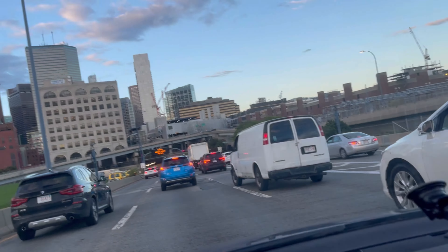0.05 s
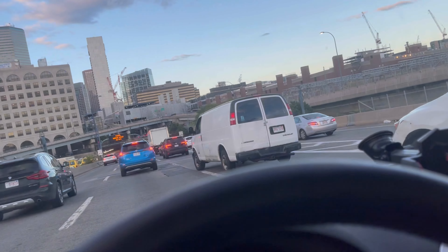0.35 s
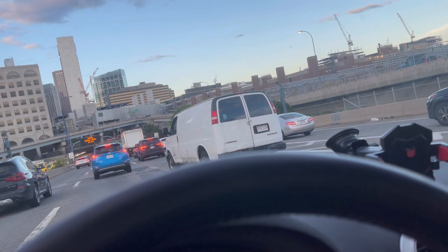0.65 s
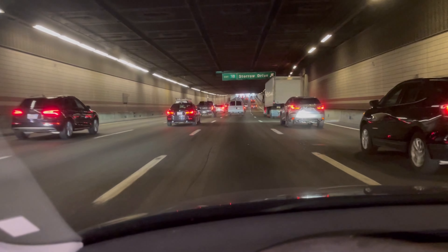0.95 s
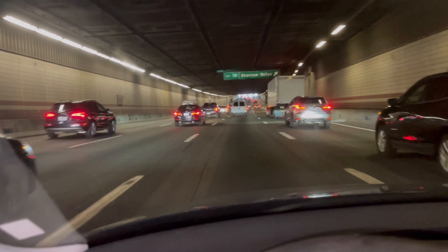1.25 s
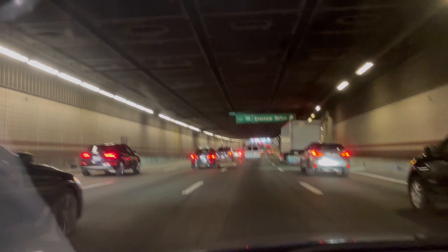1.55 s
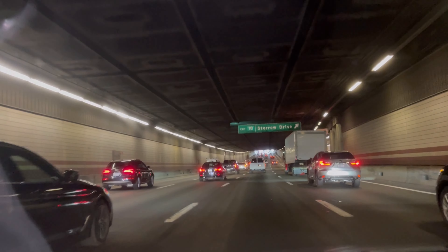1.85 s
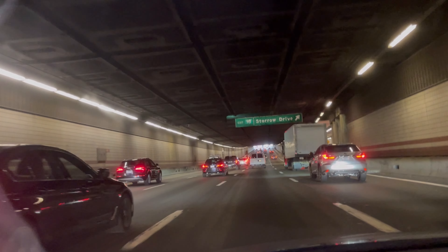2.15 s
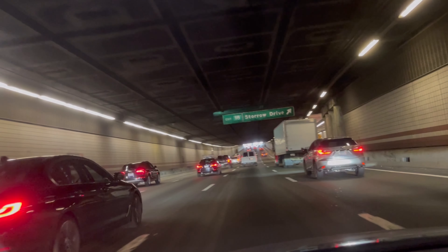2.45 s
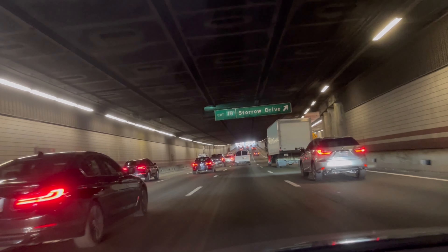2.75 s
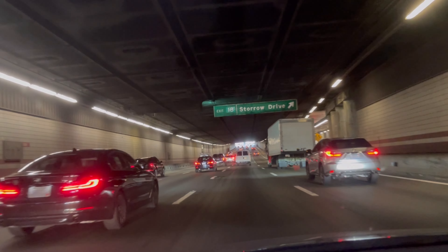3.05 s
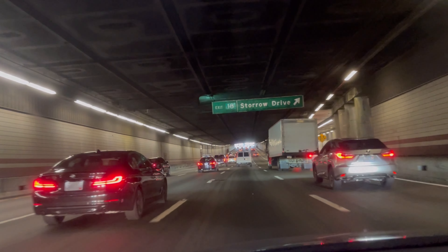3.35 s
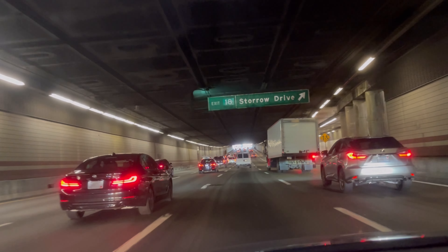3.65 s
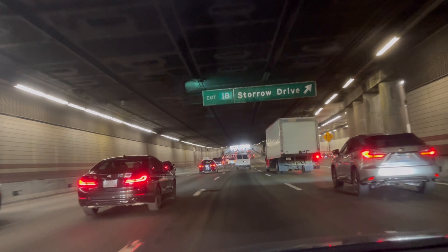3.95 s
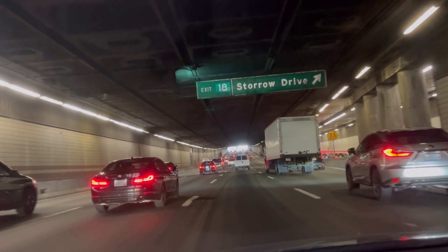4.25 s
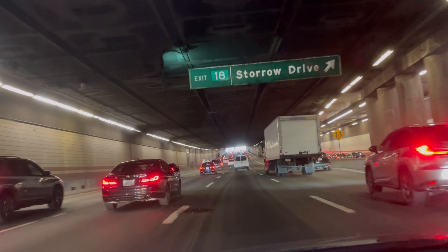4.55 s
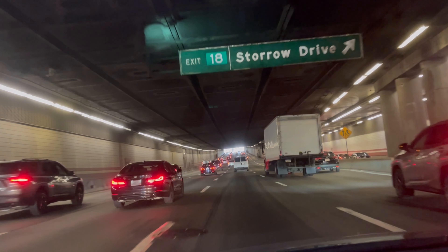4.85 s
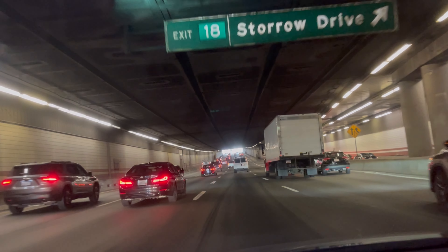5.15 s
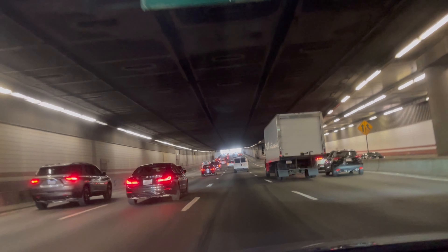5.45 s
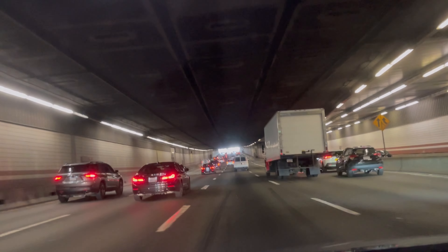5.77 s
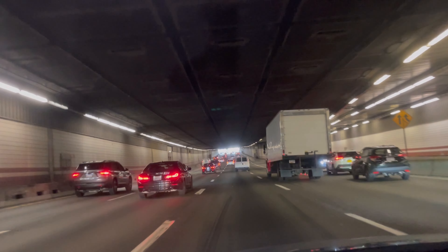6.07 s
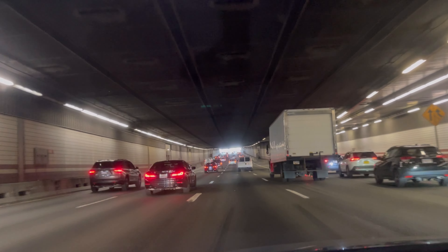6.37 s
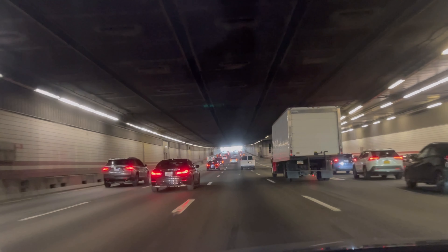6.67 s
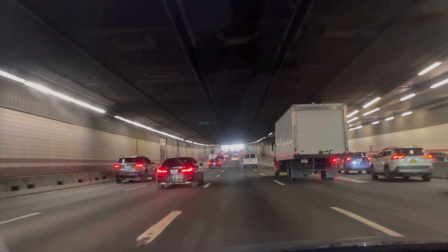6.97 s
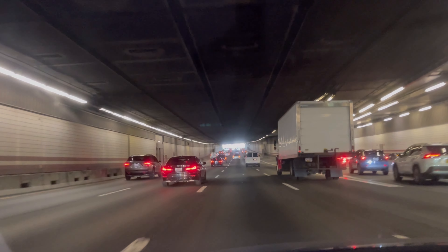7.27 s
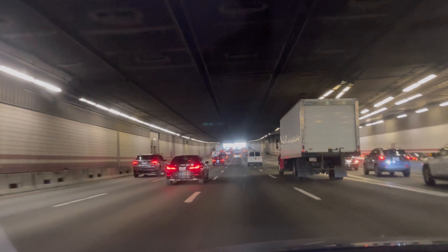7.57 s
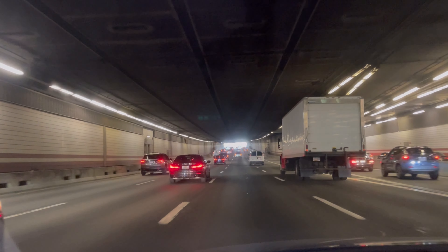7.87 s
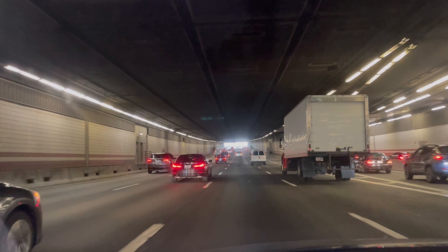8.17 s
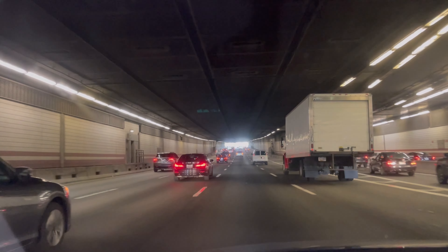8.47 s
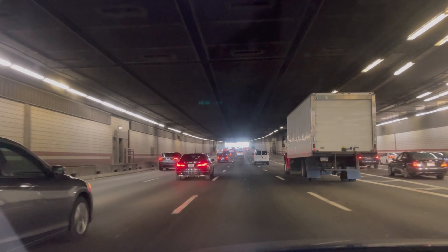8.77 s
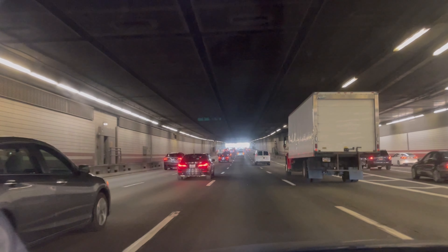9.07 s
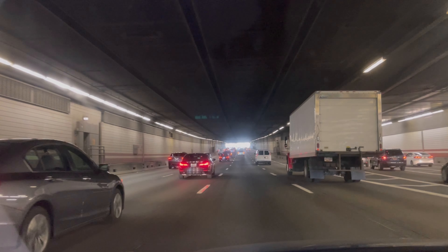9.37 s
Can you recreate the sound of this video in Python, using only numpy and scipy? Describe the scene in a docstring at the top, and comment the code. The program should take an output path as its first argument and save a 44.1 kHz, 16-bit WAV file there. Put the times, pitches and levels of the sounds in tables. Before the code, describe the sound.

Low road and engine rumble inside a moving car, turning fuller with tyre drone and muffled traffic in a tunnel.

```python
"""Inside a car in highway traffic: on the open road, then abruptly, with a click, in a tunnel.
The road shakes the cabin's low resonances; the engine booms as it pulls and shifts up twice.
The tunnel walls return the tyres' drone, and the traffic's roar comes dully through the glass.
Fingers rub and tick on the hand-held camera, and the trim squeaks faintly."""
import sys
import numpy as np
from scipy import signal
from scipy.fft import rfft, irfft, next_fast_len
from scipy.io import wavfile
from scipy.ndimage import uniform_filter1d, map_coordinates

SR = 44100
rng = np.random.default_rng(int(sys.argv[2]) if len(sys.argv) > 2 else 0)


def generate_wav(signal):
    """Clip the signal to [-1, 1] and save it as 16-bit WAV at the path in sys.argv[1]."""
    frames = np.transpose(np.atleast_2d(signal))
    scaled = np.clip(frames, -1, 1) * 32767
    pcm = np.round(scaled).astype(np.int16)
    wavfile.write(sys.argv[1], SR, pcm)


N = 419832
TUNNEL_START_S = 0.697


# car body modes: pitch_hz, width_hz, level_db
BODY_MODES = [(43.7, 9.7, -3), (53, 8, -5), (70.4, 43, -9.5), (86.5, 12, -6.5), (102.1, 14, 0.5),
              (116.3, 26, -2.5), (132.2, 15, -5.5), (162.2, 37, -14)]
# shake from the road surface: time_s, level_db
SURFACE_SHAKE = [(0, -42.5), (.33, -48), (.64, -43), (.78, -37.5), (1.55, -39.5), (2.35, -40),
                 (2.63, -38.5), (3.17, -40), (3.42, -38.5), (4.4, -39.5), (4.75, -40), (5.35, -42.5),
                 (6.03, -39), (6.22, -42.5), (6.45, -41), (7.1, -39.5), (8.24, -39), (8.55, -41),
                 (9.52, -43.5)]

def road():
    """The rough surface shakes the body's low modes; more pace favours the higher ones."""
    def body_noise(tilt):
        return cabin_noise(lambda hz: resonances(BODY_MODES)(hz) * np.clip(hz / 110, .6, 1.6) ** tilt)
    slow, fast = body_noise(tilt=-.7), body_noise(tilt=1.15)
    shake = np.sqrt(1 - pace()) * slow + np.sqrt(pace()) * fast
    shake_db, = curves(SURFACE_SHAKE)
    return pan(steadied(shake) * amp(shake_db - 0.02), left_db=2.5)


# engine speed: time_s, firing_hz
FIRING_RATE = [(0, 50.3), (.6, 48), (.75, 41.5), (1, 50.5), (2, 54), (2.85, 56.5), (3.1, 48), (3.6, 47.5),
               (4.2, 43.6), (5, 46), (6.9, 53), (8.25, 57), (8.6, 49.5), (9.3, 46.5)]
BOOM_HZ, BOOM_WIDTH_HZ = 48.6, 18
OCTAVE_HZ, OCTAVE_WIDTH_HZ, OCTAVE_DB = 114, 5.3, -4.5

def engine():
    """The firing tone and its octave grow with load and swell as each meets a cabin air mode."""
    firing_hz, = curves(FIRING_RATE)
    phase = 2 * np.pi * np.cumsum(firing_hz * (1 + .009 * wobble(7))) / SR
    mode_gain = lambda hz, mode_hz, width_hz: 1 / np.hypot(1, 2 * (hz - mode_hz) / width_hz)
    boom = np.sin(phase) * mode_gain(firing_hz, BOOM_HZ, BOOM_WIDTH_HZ)
    octave = np.sin(2 * phase) * mode_gain(2 * firing_hz, OCTAVE_HZ, OCTAVE_WIDTH_HZ) * amp(OCTAVE_DB)
    waver_db = -1.52 + 2.1 * wobble(9)
    return pan(np.sqrt(2) * (boom + octave) * throttle() * amp(waver_db), left_db=-0.5)


# accelerator presses: start_s, end_s, gain_db
PEDAL_PRESSES = [(0.058, 0.149, -38.5), (0.853, 2.85, -42), (3.066, 3.58, -40), (4.6, 5.1, -41),
                 (5.101, 6.397, -38.5), (6.406, 8.553, -40.5), (8.599, 9.363, -40)]
PEDAL_RISE_S, PEDAL_FALL_S, COAST_DB = 0.041, 0.053, -53

def throttle():
    """Engine load as a gain: each press builds, holds and dies back to coasting."""
    t = clock()
    ramp = lambda x: (1 + np.tanh(x)) / 2
    load = np.full(N, amp(COAST_DB))
    for start_s, end_s, gain_db in PEDAL_PRESSES:
        pressed = ramp((t - start_s) / PEDAL_RISE_S) * ramp((end_s - t) / PEDAL_FALL_S)
        load += (amp(gain_db) - amp(COAST_DB)) * pressed
    return load


# tyre air modes, split by rolling: slow_hz, fast_hz, width_hz, level_db
CAVITY_MODES = [(223.1, 222.5, 8, -.5), (228.6, 241, 11, -1.5)]
# tyre wall rumble: pitch_hz, width_hz, level_db
TYRE_WALL_BANDS = [(199, 77, 0.5), (229.4, 30, 0.5), (259, 64, -3)]
# tyre drone in the tunnel: time_s, level_db
DRONE_LEVEL = [(.7, -55.5), (1.05, -55.5), (2.25, -58), (2.8, -55.5), (3.1, -56), (3.52, -52), (3.9, -55.5),
               (4.35, -50), (4.72, -55.5), (5.07, -48.5), (5.4, -53.5), (5.9, -51), (6.2, -57), (6.8, -49),
               (6.98, -57), (7.25, -52), (7.9, -54), (8.2, -49), (8.5, -57.5), (9, -54), (9.33, -51),
               (9.52, -49.5)]

def tyre_drone():
    """The air in the tyres rings at two pitches that part with pace, over the tyre walls' rumble."""
    cavity = sum(hum(slow_hz + (fast_hz - slow_hz) * pace(), width_hz, side_db=-15.5) * amp(level_db)
                 for slow_hz, fast_hz, width_hz, level_db in CAVITY_MODES)
    walls = cabin_noise(resonances(TYRE_WALL_BANDS)) * amp(-1.5)
    drone_db, = curves(DRONE_LEVEL)
    return steadied(cavity + walls) * amp(drone_db)


# tunnel traffic spectrum: freq_hz, level_db
ROAR_SPECTRUM = [(200, -5), (330, 8), (480, 4.5), (600, 0), (850, -2), (1100, -3), (1550, -9.5),
                 (1680, -12), (2400, -17), (3500, -22), (5000, -30.5), (7000, -40.5), (9200, -38),
                 (10500, -52), (12000, -46), (14000, -52)]
# pane and panel modes: pitch_hz, width_hz, level_db
PANE_MODES = [(397, 47, -4), (665, 50, -5), (835, 130, -6.5), (1520, 19, -6), (1747, 33, -4),
              (2350, 540, -12.5)]
ROAR_SLOW_DB, ROAR_PACE_DB = -65, 5

def traffic_roar():
    """The traffic's roar grows with pace and is coloured by the panes it passes through."""
    through_glass = lambda hz: colour(ROAR_SPECTRUM)(hz) * (1 + resonances(PANE_MODES)(hz))
    return cabin_noise(through_glass) * amp(ROAR_SLOW_DB + ROAR_PACE_DB * pace() + 0.52 * wobble(11))


# tyre tread hum: time_s, pitch_hz, level_db
TREAD_HUM = [(.7, 315, -67.5), (3.2, 305, -69), (4.2, 350, -64.5), (5.6, 366, -64), (6.5, 362, -63.5),
             (8.1, 382, -64), (8.8, 375, -66.5), (9.52, 372, -63.5)]

def tread():
    """The tread's hum rises and grows as the car gathers speed."""
    pitch_hz, level_db = curves(TREAD_HUM)
    return hum(pitch_hz, width_hz=62, side_db=-5.5) * amp(level_db)


# tyre hiss of the next lanes: pitch_hz, width_hz, level_db
HISS_BANDS = [(2540, 660, 1.5), (3900, 660, -10)]
# vehicles alongside: middle_s, half_length_s, level_db
CLOSE_PASSES = [(4.798, 0.61, -88.5), (7.599, 0.55, -85.5), (9.101, .5, -84)]

def passing_hiss():
    """Tyre hiss swells and fades as each vehicle draws close."""
    return cabin_noise(resonances(HISS_BANDS)) * swells(CLOSE_PASSES)


def tunnel():
    """The walls return the noise of the tyres and of all the traffic."""
    traffic = traffic_roar() + passing_hiss()
    return pan(tyre_drone(), left_db=1) + pan(traffic + tread(), left_db=1.6)


# outdoor tyre noise spectrum: freq_hz, level_db
OPEN_ROAD_SPECTRUM = [(140, -19), (205, 5), (270, -16.5), (335, -5), (420, -7), (560, -25.5), (690, -11),
                      (780, -20), (1000, -20), (1500, -32), (2600, -37), (4000, -44), (6000, -53.5),
                      (13000, -63.5)]

def open_road():
    """Outdoors the tyre noise escapes and little comes back."""
    return pan(cabin_noise(colour(OPEN_ROAD_SPECTRUM)) * amp(-67.5), left_db=1)


def click():
    """A sharp click where the scene cuts from open road to tunnel."""
    age_s = clock() - TUNNEL_START_S
    return pan(amp(-40.5) * (age_s >= 0) * np.exp(-np.abs(age_s) / 0.0024), left_db=0.5)


# plastic modes: pitch_hz, level_db, t60_s
PLASTIC_MODES = [(432, -0.5, 0.029), (834, 1, 0.02), (1350, -6.5, .014)]
KNOCK_S, KNOCK_DB = 0.5492, -57

def knock():
    """A small dull knock rings three damped modes of plastic."""
    age_s = np.maximum(clock() - KNOCK_S, 0)
    ring = sum(amp(level_db - 60 * age_s / t60_s) * np.sin(2 * np.pi * pitch_hz * age_s)
               for pitch_hz, level_db, t60_s in PLASTIC_MODES)
    return ring * amp(KNOCK_DB)


# contacts on the camera case: start_s, level_db, t60_s, bright_share, pitch_hz
CASE_TICKS = [(0.01, -73, .09, .2, 6490), (0.0508, -69.5, .13, .4, 5990), (.1396, -75.5, .04, 0, 6000),
              (0.2495, -82, .025, .5, 8500), (.5495, -79.5, .012, 0.1, 1016), (1.077, -77, .025, .7, 5530),
              (1.222, -60.5, .0066, 0.01, 4200), (1.3172, -69.5, .014, 1, 7470),
              (1.3237, -75, .01, .9, 7980), (1.3333, -64, .014, 0.8, 10980),
              (1.3445, -74, .012, 0.9, 11300), (1.3695, -57.5, .016, .8, 8690),
              (1.3765, -58, .015, .4, 4210), (1.403, -68.5, .012, 0.93, 11010),
              (1.4462, -50.5, .006, 0.02, 11700), (1.8585, -79.5, .012, .9, 11000),
              (1.876, -67, .025, 0.4, 4480), (1.89, -71, .034, .5, 9040), (2.03, -84, .012, .9, 9000),
              (2.065, -78.5, .02, .7, 7000), (2.089, -73, .03, 0.4, 8800), (2.12, -79.5, .02, .6, 6000),
              (2.2138, -85, .012, .8, 8520), (2.801, -80.5, .025, .7, 8020), (2.8828, -79, .016, 0.7, 8000),
              (2.929, -78, .016, .5, 6520), (3.0096, -58, 0.034, 0.45, 7090),
              (3.2495, -75.5, .016, .8, 8030), (5.2796, -82, .035, .9, 8000), (5.5189, -69, .013, .6, 7480),
              (5.588, -80.5, .025, .9, 8770), (5.688, -81.5, .015, .8, 8500), (7.333, -79, .03, .7, 7520)]
TICK_RING_GAIN, TICK_Q, TICK_RISE_PER_T60 = 0.97, 3.2, 0.019
HARD_T60_S, BRUSH_T60_S = 0.016, .012

def ticks():
    """Short contacts snap, long ones brush the case: dull when pressed, bright when skin slips free."""
    age_s = np.arange(SR // 8) / SR
    dull, bright = np.zeros((2, N))
    for start_s, level_db, t60_s, bright_share, pitch_hz in CASE_TICKS + catches():
        attack = 1 - np.exp(-age_s / (TICK_RISE_PER_T60 * t60_s))
        tick = rng.standard_normal(len(age_s)) * amp(level_db - 60 * age_s / t60_s) * attack
        tick *= min(1, t60_s / BRUSH_T60_S)
        tick[0] = amp(level_db + 16) * np.exp(-t60_s / HARD_T60_S)  # opening snap
        tick += TICK_RING_GAIN * signal.lfilter(*signal.iirpeak(pitch_hz, TICK_Q, SR), tick)
        first = round(start_s * SR)
        span = slice(first, first + len(age_s))
        dull[span] += np.sqrt(1 - bright_share) * tick
        bright[span] += np.sqrt(bright_share) * tick
    return amp(2) * (filtered(dull, colour(CASE_SPECTRUM)) + filtered(bright, colour(SKIN_SPECTRUM)))


# finger strokes: middle_s, half_length_s, level_db, bright_share
STROKES = [(0.063, .11, -93.5, 0.7), (.108, 0.0072, -88.5, 0.7), (0.256, .012, -93.5, .9),
           (1.318, 0.016, -85.5, 0.99), (1.408, 0.028, -79, 0.98), (1.568, 0.088, -71.5, 1),
           (1.8, 0.052, -90.5, 0.94), (1.888, 0.017, -80, 0.4), (1.926, 0.044, -85.5, .8),
           (2.114, .05, -89, 0.8), (2.271, 0.064, -97, 0.98), (2.83, 0.011, -89.5, .9),
           (2.942, 0.064, -93, .8), (3.265, 0.018, -93, 0.8), (5.384, 0.048, -96.5, 0.86),
           (5.54, 0.074, -92, .9), (5.603, .014, -87, 0.87), (5.721, .027, -84.5, 0.8),
           (6.85, .06, -96.5, 0.8), (7.35, .044, -93.5, 0.9), (7.64, 0.083, -98.5, 0.97),
           (8.04, .045, -97.5, 0.98), (8.22, 0.048, -99, 0.99), (8.961, 0.037, -98, 0.93)]
# slipping skin spectrum: freq_hz, level_db
SKIN_SPECTRUM = [(1000, -29), (2500, -16.5), (4000, -6.5), (4600, -6.5), (5900, -2), (7200, -5), (8600, 2),
                 (10000, 3.5), (11200, 3.5), (12000, -7.5), (12600, -12), (13500, -31.5)]
# pressed case spectrum: freq_hz, level_db
CASE_SPECTRUM = [(200, -16.5), (1000, 4.5), (2100, 9), (4300, 0), (5500, -7), (7200, -2.5), (8700, -14),
                 (11000, -8), (13500, -20)]
GRIP_DB, GRIP_SWING_DB = -109, 3.5

def fingers():
    """Skin sticks and slips over the camera in strokes, duller when pressed; the grip never rests."""
    dull_power, bright_power = np.zeros((2, N))
    for middle_s, half_s, level_db, bright_share in STROKES:
        power = (amp(level_db) * swell(middle_s, half_s)) ** 2
        dull_power += (1 - bright_share) * power
        bright_power += bright_share * power
    bright_power += amp(GRIP_DB + GRIP_SWING_DB * wobble(9.8)) ** 2
    stick_slip_db = .4 * wobble(45) + .7 * wobble(220) + 3 * wobble(2500)
    grain = rng.standard_normal(N) * amp(stick_slip_db)
    bright = np.sqrt(bright_power) * unit(filtered(grain, colour(SKIN_SPECTRUM)))
    dull = np.sqrt(dull_power) * unit(filtered(grain, colour(CASE_SPECTRUM)))
    return amp(3) * (bright + dull)


CATCHES_PER_S, CATCH_BOOST_DB, CATCH_SPREAD_DB = 51, 2.5, 2.5
CATCH_T60_S, CATCH_BRIGHT_SHARE, CATCH_HZ = .01, .8, 8500

def catches():
    """Skin catches at random within each stroke: small ticks, as rows like CASE_TICKS."""
    rows = []
    for middle_s, half_s, stroke_db, _ in STROKES:
        count = round(2 * half_s * CATCHES_PER_S)
        for place, size in rng.uniform(-1, 1, (count, 2)):
            start_s = abs(middle_s + place * half_s)
            level_db = stroke_db + CATCH_BOOST_DB + size * CATCH_SPREAD_DB
            rows.append((start_s, level_db, CATCH_T60_S, CATCH_BRIGHT_SHARE, CATCH_HZ))
    return rows


# phase between the microphone ports: freq_hz, left_lead_rad
PORT_PHASE = [(500, 1.5), (3300, 1.43), (7700, 0.97), (8700, -1), (9700, -2.25), (10200, -3.1), (10800, -4),
              (11700, -5), (12700, -6)]

def handling():
    """Sounds in the camera body reach two ports that ring at different pitches, so out of step."""
    touch = fingers() + ticks() + knock()
    ports = lambda hz: np.exp(.5j * along(PORT_PHASE, hz) * np.array([[1], [-1]]))
    return pan(filtered(touch, ports), left_db=1)


# trim modes: pitch_hz, width_hz, level_db
TRIM_MODES = [(3980, 150, 2.5), (4275, 200, -6)]
# trim squeaks: middle_s, half_length_s, level_db
TRIM_SQUEAKS = [(0.332, .03, -103.5), (.603, .02, -99.5)]

def squeaks():
    """Plastic trim rubs and sings thinly, twice."""
    return cabin_noise(resonances(TRIM_MODES)) * swells(TRIM_SQUEAKS)


# left-right likeness in the cabin: freq_hz, correlation
COHERENCE = [(30, 0.98), (50, 1), (130, 0.98), (230, 0.9), (380, 0.34), (600, .12), (1000, 0.075),
             (2000, 0.46), (4000, 0.65), (9000, .2)]

def cabin_noise(response):
    """Stereo noise, mid at rms 1: long waves reach both microphones alike, short ones do not."""
    def mid_side_response(hz):
        angle_rad = np.arccos(np.clip(along(COHERENCE, hz), -1, 1)) / 2
        return response(hz) * np.array([np.ones_like(hz), np.tan(angle_rad)])
    mid, side = filtered(rng.standard_normal((2, N)), mid_side_response)
    return np.array([mid + side, mid - side]) / np.std(mid)


# the car's pace: time_s, pace_fraction
CAR_PACE = [(0, 0.67), (.8, 0.24), (3.5, 0.23), (5, 0.42), (8.2, 0.68), (9.1, 0.77)]

def pace():
    """0 slow to 1 fast, per sample."""
    return curves(CAR_PACE)[0]


def hum(pitch_hz, width_hz, side_db):
    """Narrow stereo noise at rms 1 along a pitch curve."""
    phase = 2 * np.pi * np.cumsum(pitch_hz) / SR
    mid, side = (wobble(width_hz) * np.cos(phase) + wobble(width_hz) * np.sin(phase) for _ in range(2))
    side *= amp(side_db)
    return unit(np.array([mid + side, mid - side]))


def swell(middle_s, half_s):
    """A smooth rise and fall of height 1."""
    from_middle_s = np.abs(clock() - middle_s)
    return np.exp(-(from_middle_s / (1.54 * half_s)) ** 2.9) * (from_middle_s < 4 * half_s)


def swells(rows):
    """A gain curve with one swell per row."""
    return sum(amp(level_db) * swell(middle_s, half_s) for middle_s, half_s, level_db in rows)


def steadied(x):
    """x without its slow swells; fast beating stays."""
    return x / np.sqrt(np.abs(uniform_filter1d(np.mean(x ** 2, axis=0), size=SR // 5)))


def wobble(rate_hz):
    """A smooth random curve at rms 1."""
    knots = rng.standard_normal(int(N * rate_hz / SR) + 4)
    return unit(map_coordinates(knots, [clock() * rate_hz]))


def resonances(modes):
    """The response of steep-sided resonances whose powers add."""
    def peak(hz, pitch_hz, width_hz):
        return (hz * width_hz) ** 2 / ((pitch_hz ** 2 - hz ** 2) ** 2 + (hz * width_hz) ** 2)
    return lambda hz: np.sqrt(sum((amp(level_db) * peak(hz, pitch_hz, width_hz)) ** 2
                                  for pitch_hz, width_hz, level_db in modes))


def colour(spectrum):
    """The response of freq_hz, level_db points."""
    return lambda hz: amp(along(spectrum, hz))


def filtered(x, response):
    """x through a frequency response."""
    size = next_fast_len(N + 8192, real=True)
    hz = np.fft.rfftfreq(size, 1 / SR).astype(np.float32)
    return irfft(rfft(x.astype(np.float32), size) * response(hz), size)[..., :N]


def along(points, hz):
    """Points read on a log frequency axis."""
    freq_hz, values = np.transpose(points)
    return np.interp(np.log(hz + 1), np.log(freq_hz + 1), values)


def curves(rows):
    """One value per sample for each column after time_s."""
    time_s, *columns = np.transpose(rows)
    return [np.interp(clock(), time_s, column) for column in columns]


def pan(x, left_db):
    return x * amp([[left_db / 2], [-left_db / 2]])


def amp(db):
    return 10 ** (np.asarray(db) / 20)


def unit(x):
    return x / np.sqrt(np.mean(x ** 2) + 1e-20)


def clock():
    return np.arange(N) / SR


def scene():
    """Road and engine throughout; the surroundings switch at once."""
    outside = np.where(clock() < TUNNEL_START_S, open_road(), tunnel())
    return road() + engine() + outside + handling() + click() + squeaks()


BAND_LIMIT_HZ = 13108

def record(dry):
    """The camera cuts off steeply at its band limit."""
    return filtered(dry, lambda hz: 1 / np.sqrt(1 + (hz / BAND_LIMIT_HZ) ** 80))


dry = scene()
out = record(dry)
generate_wav(out)
```